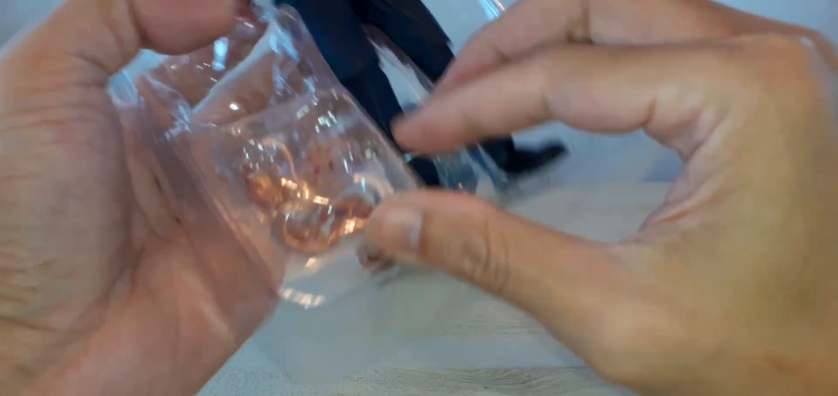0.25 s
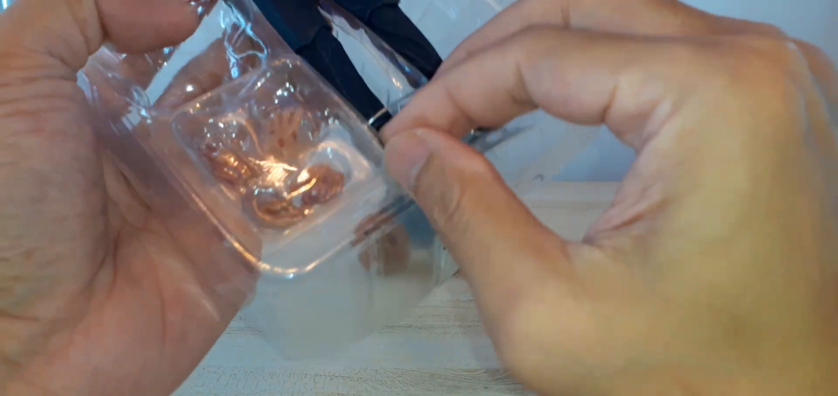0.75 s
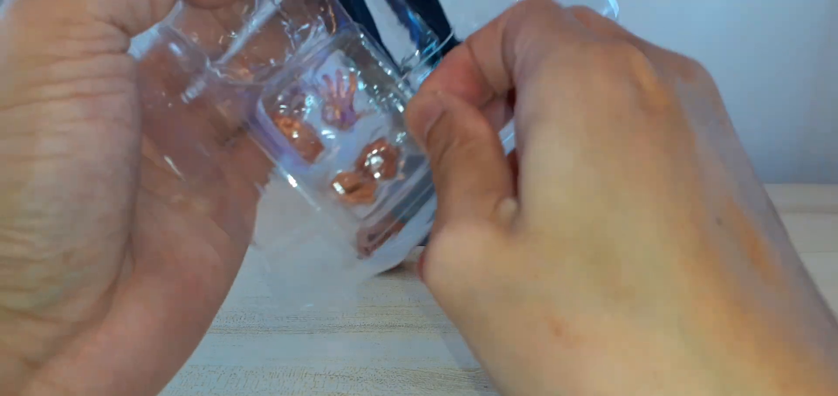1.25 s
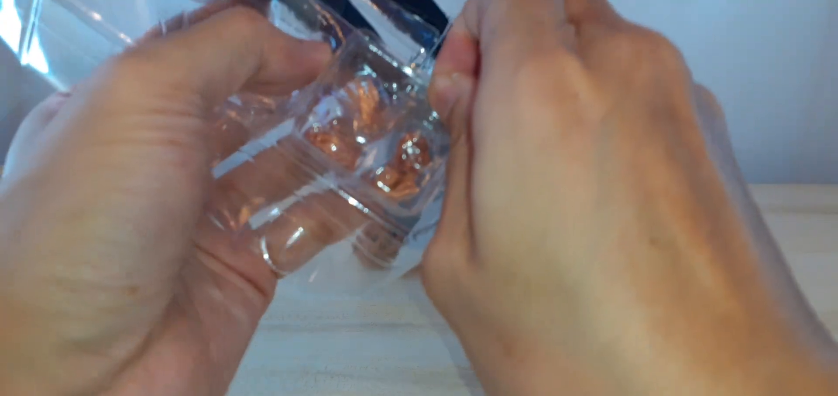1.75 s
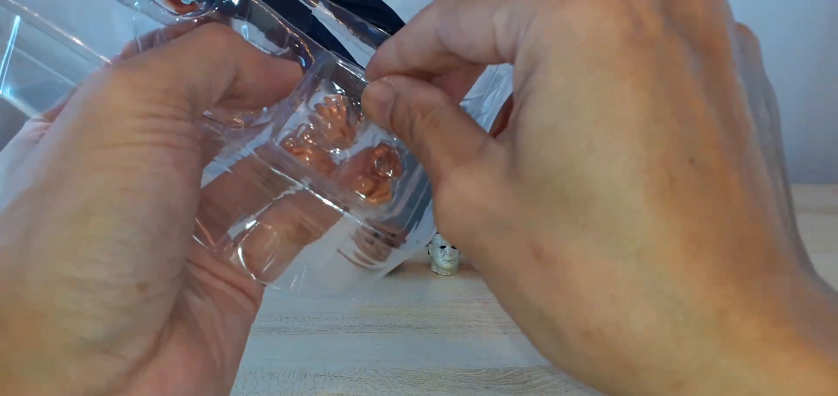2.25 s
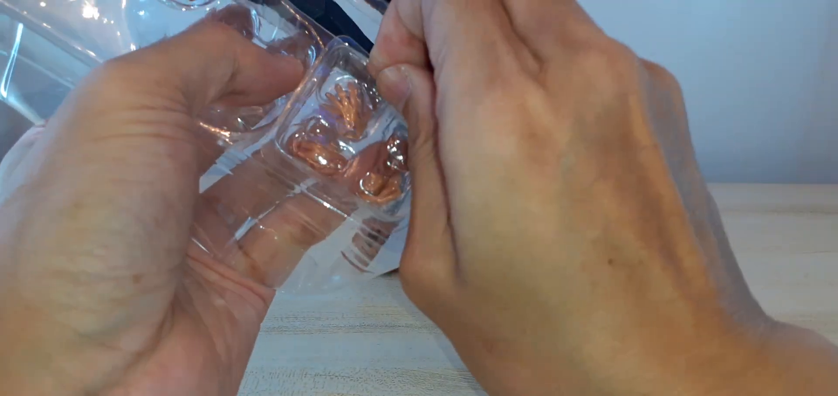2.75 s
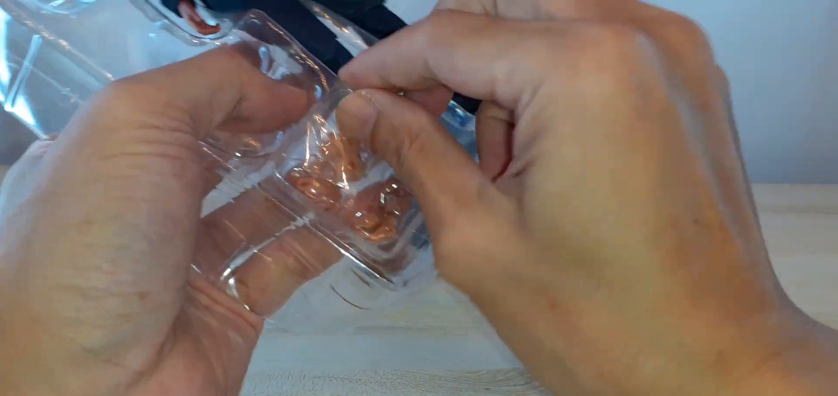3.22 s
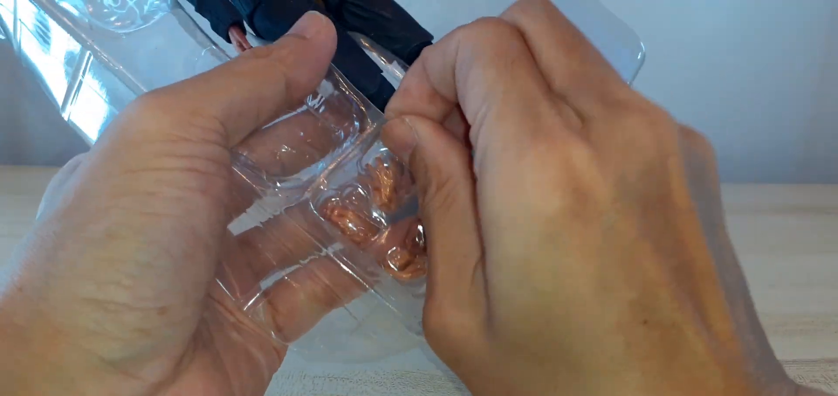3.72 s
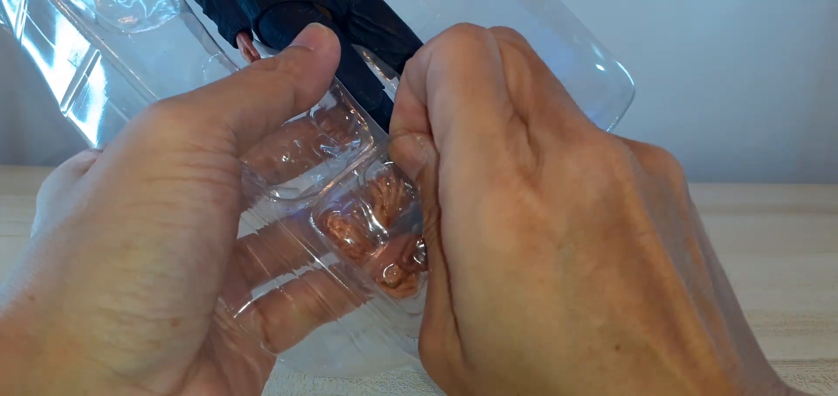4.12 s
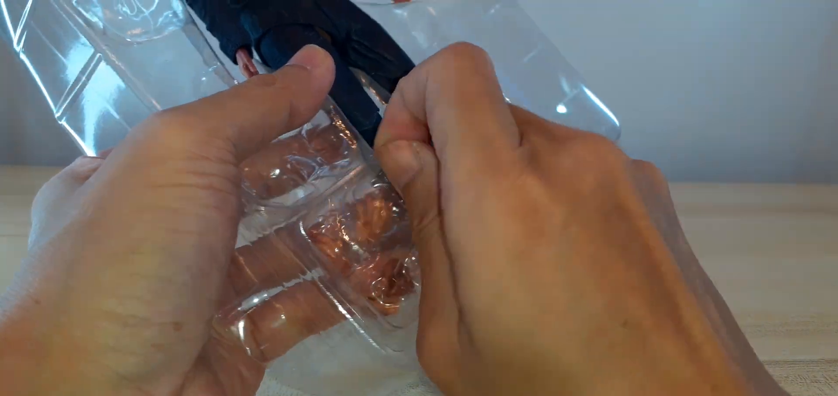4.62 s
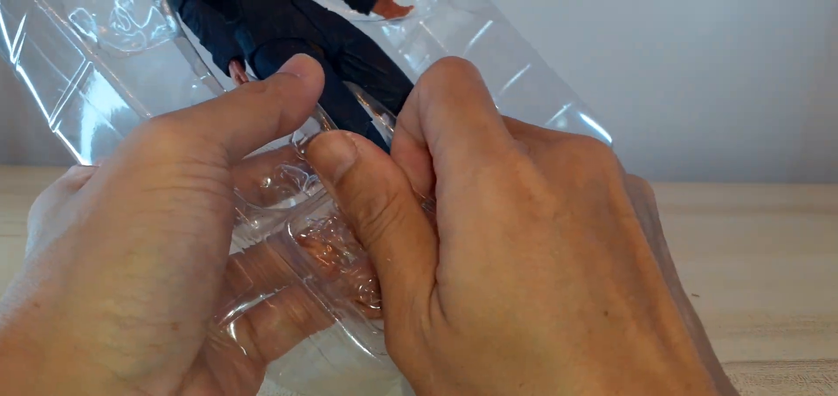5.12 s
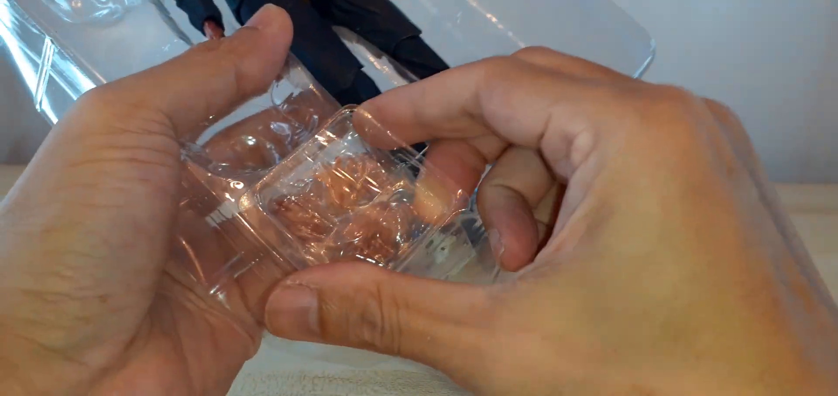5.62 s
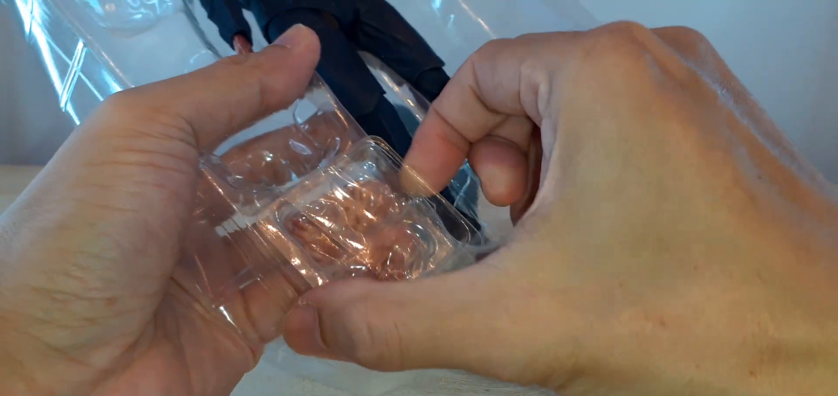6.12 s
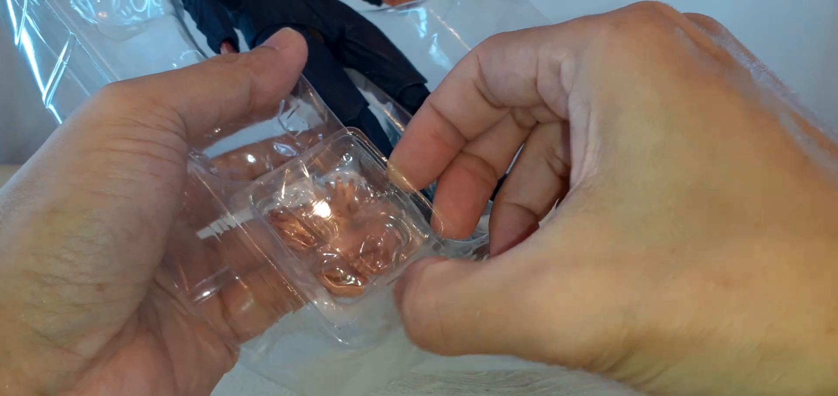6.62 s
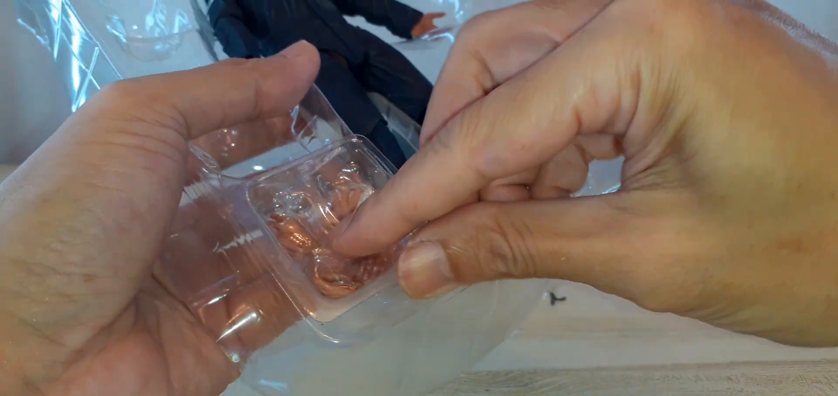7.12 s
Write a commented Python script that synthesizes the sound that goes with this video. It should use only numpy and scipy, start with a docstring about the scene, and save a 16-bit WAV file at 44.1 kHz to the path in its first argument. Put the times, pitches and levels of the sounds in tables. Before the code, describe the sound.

Close stereo pickup of fingers working a thin, hollow plastic blister tray in a small, lightly echoing room. Faint rubs and tiny ticks come first, then a burst of sharp snaps just after one second. A brief lull holds a barely audible squeak, then dense loud crackling with popping domes. It fades to scattered ticks, a dull knock with a pop near six seconds, quiet rubbing and a last hard crack.

```python
"""A light finger rub and a faint snap, then many sharp snaps: two hands pry at a thin plastic blister tray.
It holds small toy parts, close to a stereo microphone in a small room. Buckling facets are shaped noise bursts;
finger rubs are random stick-slip grains; dull knocks are decaying sines; one faint squeak is gliding tones.
The tray's body modes colour all but squeak and air; the room, decaying noise, rings for about half a second."""
import sys
import numpy as np
from scipy import signal
from scipy.fft import rfft, irfft
from scipy.io import wavfile
from scipy.ndimage import uniform_filter1d, map_coordinates

SR = 44100
rng = np.random.default_rng(int(sys.argv[2]) if len(sys.argv) > 2 else 0)


def bounce(signal):
    """Save signal as a 16-bit WAV file at the path given by the first command-line argument."""
    frames = np.transpose(np.atleast_2d(signal))
    limited = np.clip(frames, -1, 1)
    pcm = np.round(limited * 32767).astype(np.int16)
    wavfile.write(sys.argv[1], SR, pcm)


N = 324576

# buckling facets: start_s, crack_db, flex_db (re crack), treble_db (re crack), room_db (echo re direct)
FACET_SNAPS = [(0.0124, -46, -13, -4.5, -1.5), (0.244, -57, 0, -30, 5), (0.414, -47, -23, -15, -29),
               (0.8172, -40.5, -14.5, 7, -2.5), (1.0845, -35, -11.5, -4.5, -4), (1.142, -41, -12, -14, -8),
               (1.1773, -28, 0.5, -5, -13.5), (1.236, -32.5, 5, -0.5, -1.5), (1.276, -22, -5.5, -3.5, -8),
               (1.339, -48, -0.5, 16, -6), (1.3569, -15.5, -8, -5.5, -5.5),
               (1.3636, -21, -14.5, -2.5, -12.5), (1.4662, -33, -10, -2.5, -20),
               (1.4804, -32, -10, -20, -10.5), (1.5969, -25.5, -17.5, -6, -8.5),
               (1.6384, -34, -0.5, 1, -11), (1.7732, -47, -21, 1, -9.5), (2.0126, -36.5, -19.5, -22, -3),
               (2.0349, -39, -10, -6.5, -12), (2.0468, -45, -1, 12, -8), (2.1059, -28.5, -7.5, -7.5, -5),
               (2.204, -48.5, -7.5, 2.5, -2), (2.4983, -54.5, -8, .5, -2.5), (2.5807, -42, -4.5, -13, -5.5),
               (2.6942, -32.5, -6, -4.5, 2.5), (2.7859, -27, -3, 1, -7), (2.8352, -30.5, -5, -33.5, -3.5),
               (2.8844, -28.5, -6.5, -28.5, -28.5), (2.9611, -13, -19, -8, -10.5),
               (2.988, -24, -11, -13, 1), (3.061, -28.5, -9.5, -6, 0.5), (3.128, -25, -19.5, -5.5, -8),
               (3.1721, -28, -16, -13, -3), (3.2061, -19.5, -15.5, -4.5, -3.5),
               (3.2294, -26.5, -18, -4.5, -11), (3.567, -38.5, -6.5, -11, -0.5),
               (3.631, -14.5, -13, -5, -6.5), (3.6382, -23.5, -5.5, -21.5, -3),
               (3.7504, -17.5, -35, -12, -9.5), (3.773, -24, -21, -3, -5.5), (3.8915, -28, -14, 3.5, 0),
               (3.957, -31, -23, -4.5, 0), (4.0482, -29, -10.5, 6, -5.5), (4.0587, -22.5, -10.5, 0.5, 0.5),
               (4.392, -41, -21.5, -28, -2.5), (4.4269, -28.5, -14, -12, -4.5),
               (4.4701, -19, -14.5, -3.5, -5), (4.5022, -14.5, -14.5, -17, -5),
               (4.5765, -17.5, -11, -9, -5), (4.6625, -21, -9.5, -10, -4.5), (4.6817, -19, -27, -1.5, -6),
               (4.815, -39.5, -13, 3, -3), (4.864, -29, -2.5, -10, -2.5), (4.8885, -31.5, -6, -6.5, -16),
               (5.0208, -41, -28, -13, -17), (5.071, -48.5, -16, -28, -21), (5.113, -55, -16, -2, -22),
               (5.193, -37.5, -29, -14.5, -8.5), (5.2668, -44.5, -12.5, -7, -7),
               (5.3683, -50.5, -4.5, -20, 2.5), (5.4935, -39.5, -14.5, 2.5, -4),
               (5.6096, -49.5, -10, -1.5, -21), (5.9409, -33.5, -7, -6.5, 1.5), (5.981, -28, -19, 4.5, 1.5),
               (6.2123, -35, -14, -8.5, -1.5), (6.28, -40.5, -9, -17, -30), (6.3262, -36.5, -5, -6, -3.5),
               (6.3966, -43.5, -6, -37, -2), (6.5486, -44.5, 0, -1, -19), (6.7504, -42.5, -8.5, -5.5, -6.5),
               (6.84, -48.5, -7, -11, -21), (6.9562, -46.5, -14, -17, -9), (7.0846, -32, -22, -2, -1),
               (7.24, -38, -9, -13, 7), (7.2582, -16.5, -9.5, -4, -7.5)]
# blister domes popping through: start_s, room_level_db, pitch_hz, direct_extra_db
DOME_POPS = [(2.106, -30, 2660, 4.5), (3.131, -34, 2620, 9), (3.893, -19.5, 2610, -3.5),
             (4.060, -18.5, 1990, -10), (4.503, -22, 2020, -11), (5.982, -22.5, 2180, -7),
             (7.086, -27.5, 2120, -3)]
# finger strokes over the sheet: start_s, end_s, crackle_db (before the rub gains in tray)
FINGER_RUBS = [(0, .028, -45), (.245, .43, -54), (.658, .73, -51), (.913, 1.16, -57.5), (1.19, 1.338, -45),
               (1.451, 1.559, -46), (1.645, 1.845, -56.5), (2.02, 2.087, -43.5), (2.541, 2.682, -55),
               (2.718, 2.92, -43), (2.989, 3.318, -43.5), (3.657, 3.809, -39.5), (4.19, 4.30, -54),
               (4.505, 4.727, -44), (4.869, 4.943, -47), (4.984, 5.474, -57), (5.588, 5.657, -59),
               (5.834, 5.942, -74), (6.187, 6.425, -61.5), (6.491, 6.554, -41), (6.575, 7.03, -63.5),
               (7.19, 7.252, -48), (7.281, 7.351, -40)]
# soft knocks of hand and tray: start_s, level_db (before envelope and lean), pitch_hz, t60_s
SOFT_KNOCKS = [(.286, -27, 121, 0.058), (0.324, -38, 103, 0.14), (.335, -32.5, 264, 0.071),
               (0.371, -39, 115, .14), (1.233, -22, 164, 0.036), (1.357, -30.5, 129, 0.13),
               (1.64, -14, 270, 0.032), (2.708, -13.5, 251, 0.04), (3.194, -31, 170, .05),
               (4.059, -37, 98, 0.057), (4.861, -21.5, 227, 0.058), (5.093, -24.5, 245, 0.011),
               (5.611, -52, 107.7, 0.17), (5.982, -7, 310, 0.014), (5.979, -14.5, 105.6, 0.041),
               (5.982, -41, 56, 0.29), (6.495, -33, 194, 0.045), (7.258, -20, 204, 0.028)]
# taut edge dragged under a finger: time_s, lower_hz, upper_hz, level_db (before flutter and partial gains)
SQUEAK_GLIDE = [(1.829, 6050, 7200, -61), (1.888, 6440, 8100, -78), (1.93, 6800, 8550, -68),
                (1.965, 6870, 8700, -65), (2.005, 6550, 8300, -62)]
# colour of the flexing tray: freq_hz, gain_db
FLEX_COLOUR = [(40, -37.5), (80, -20), (140, -15.5), (200, -6.5), (280, -1), (355, 1), (430, -5.5),
               (600, -10), (1200, -39)]
# colour of the cracking sheet: freq_hz, gain_db
CRACK_COLOUR = [(250, -28.5), (480, -8), (640, -5), (800, -1.5), (1030, 5), (1280, 0.5), (1550, 2),
                (2300, -2.5), (3200, -6.5), (4200, -14), (6000, -37.5)]
# colour of the tiny folds: freq_hz, gain_db
TREBLE_COLOUR = [(2500, -19), (4000, 0), (6500, 1.5), (8500, 1), (9500, -12), (11000, -8.5), (12300, -4.5),
                 (15300, -10.5), (16500, -17)]
# modes of the whole tray: freq_hz, width_hz, gain_db (re plain sound)
BODY_MODES = [(362, 22, -8.5), (524.3, 14, -5), (643, 6.9, 2.5), (735, 7.2, -5), (840, 48, -9),
              (1018.5, 30, -4), (1190, 50, -10.5), (1419, 18, -8), (1653, 34, -5.5), (2080, 6.7, -7),
              (2410, 270, -10), (2680, 30, -9.5)]
# room decay: freq_hz, t60_s
ROOM_DECAY = [(100, 0.56), (300, 0.45), (800, 0.53), (2000, 0.54), (5000, 0.5), (13000, 0.42)]
# room colour: freq_hz, gain_db
ROOM_COLOUR = [(50, -7.5), (160, -2.5), (330, -0.5), (520, -0.5), (1000, -3), (2300, 0), (5000, -0.5),
               (8000, -1.5), (14000, -2.5)]
# colour of the still air: freq_hz, gain_db
AIR_COLOUR = [(25, -8), (100, 12.5), (350, -3.5), (1000, -4), (3000, -21), (8000, -14), (10000, -13),
              (16000, -29.5)]

# brighter facets are smaller: shorter crease (halved per HALVING_DB), higher ring (doubled per OCTAVE_DB)
CREASE_MS, HALVING_DB, LONGEST_MS = 2.38, 9.5, 3.6  # CREASE_MS and FACET_HZ hold at 0 dB of treble
FACET_HZ, OCTAVE_DB, LOWEST_FACET_HZ = 2330, 11, 1110
# rustle equals crackle at RUSTLE_EVEN_DB; RUSTLE_GROWTH is dB per dB of crackle
RUSTLE_EVEN_DB, RUSTLE_GROWTH = -66.5, 0.94
# fizz re crackle is FIZZ_DB at a crackle of FIRM_DB; FIZZ_GROWTH is dB per dB of crackle
FIZZ_DB, FIRM_DB, FIZZ_GROWTH = -5, -42, 0.11
HOLD_DB = -71  # holding hand's crackle throughout, before the rub gains in tray
BODY_DB = -0.5  # gain on plain sound and modes alike
PORT_LAG_S = 0.0002164  # the left port is nearer
TOP_HZ = 16250
HZ = np.maximum(np.fft.rfftfreq(1024, 1 / SR), 1)  # grid for colour filters


def undb(db):
    """Decibels to gain."""
    return 10 ** (np.asarray(db) / 20)


def along(points, hz):
    """Read (Hz, value) points on a log-frequency axis."""
    point_hz, value = np.transpose(points)
    return np.interp(np.log(np.maximum(hz, 1)), np.log(point_hz), value)


def colour(x, db):
    """Causal filter with the gain db on the grid HZ, built from its folded cepstrum."""
    cepstrum = irfft(np.log(undb(db)))
    half = len(cepstrum) // 2
    cepstrum[1:half] *= 2
    cepstrum[half + 1:] = 0
    impulse = irfft(np.exp(rfft(cepstrum)))
    return signal.fftconvolve(x, impulse[None], axes=1)[:, :x.shape[1]]


def resonance(hz, q):
    """Gain in dB of one damped mode on the grid HZ."""
    return -10 * np.log10(1 + (q * (HZ / hz - hz / HZ)) ** 2)


def level(x, db, seconds):
    """Scale a stereo sound to db, with its energy spread over the given time."""
    rms = np.sqrt(np.sum(x ** 2) / (2 * seconds * SR) + 1e-20)
    return x * undb(db) / rms


def ports(size, apart):
    """Noise at two ports: a common part and a share that each hears alone."""
    apart = np.clip(apart, 0, 1)
    common = np.sqrt(1 - apart) * rng.standard_normal(size)
    return common + np.sqrt(apart) * rng.standard_normal((2, size))


def burst(t, decay_ms, rise_ms):
    """Envelope that swells quickly and dies away."""
    ms = t * 1000
    return (1 - np.exp(-ms / rise_ms)) * np.exp(-ms / decay_ms)


def add(out, start_s, x):
    """Mix x into out at start_s."""
    i = int(np.clip(start_s * SR, 0, N - 1))
    out[:, i:i + x.shape[1]] += x[:, :N - i]


def facet_shape(treble_db):
    """Crease length (ms) and ring pitch (Hz) of a facet, both set by how bright it is."""
    length_ms = min(CREASE_MS * 2 ** (-treble_db / HALVING_DB), LONGEST_MS)
    ring_hz = max(FACET_HZ * 2 ** (treble_db / OCTAVE_DB), LOWEST_FACET_HZ)
    return length_ms, ring_hz


def snap(crack_db, flex_db, treble_db, length_ms, ring_hz, ring_db=-7, ring_q=6, ring_ms=4.1,
         flex_ms=5.6, tilt=0.67, lumpy_db=4):
    """A facet flips: a run of tiny folds spits treble, the sheet cracks and rings, the whole tray flexes."""
    size, span_s = 2048, .01
    t = np.arange(size) / SR
    # the crease runs in fits and starts, 16 samples each
    fits = np.clip(rng.standard_normal(size // 16), -2, 2)
    lumps = undb(lumpy_db * np.repeat(fits, 16))

    folds = ports(size, apart=.6) * lumps * burst(t, length_ms, rise_ms=.15)
    # sharper folds reach further into the top octave
    sharpness_db = np.clip(treble_db + 1.5, -10, 14)
    top_db = tilt * sharpness_db * np.log2(np.maximum(HZ, 4000) / 7000)
    treble = colour(folds, along(TREBLE_COLOUR, HZ) + top_db)

    sheet = ports(size, apart=0.53) * lumps * burst(t, ring_ms + 1.5 * length_ms, rise_ms=.25)
    crack = colour(sheet, along(CRACK_COLOUR, HZ))
    ring = ports(size, apart=0.64) * burst(t, ring_ms, rise_ms=0.26)
    facet = colour(ring, resonance(ring_hz, ring_q))
    bend = ports(size, apart=0.18) * burst(t, flex_ms, rise_ms=1.0)
    flex = colour(bend, along(FLEX_COLOUR, HZ))

    mix = level(crack, -1.44, span_s) + level(facet, ring_db, span_s)
    mix = mix + level(treble, treble_db, span_s) + level(flex, flex_db + .5, span_s)
    return undb(crack_db) * mix


def pop(level_db, hz, q=2.3, decay_ms=2.1):
    """A dome turns inside out: a noise burst rings around one pitch."""
    t = np.arange(1024) / SR
    flip = ports(len(t), apart=1.0) * burst(t, decay_ms, rise_ms=.3)
    return level(colour(flip, 2 * resonance(hz, q)), level_db, .01)


def rub(seconds, crackle_db, rustle_db, fizz_db, rate_hz=160, spread_db=5.0, grain_ms=2.2):
    """Skin sticks and slips on the sheet: many little jerks of very uneven size over a faint steady drag."""
    size = int(max(seconds, .02) * SR)
    span_s = size / SR
    t = np.arange(size + 1024) / SR
    hits = rng.random(size) < rate_hz / SR
    jerks = hits * undb(spread_db * np.minimum(rng.exponential(size=size), 2.8))
    grip = signal.fftconvolve(jerks, burst(t, grain_ms, rise_ms=0.11))[:len(t)]
    grip[:size] += .18 * signal.windows.tukey(size, .5)  # steady drag

    crackle = colour(ports(len(t), apart=0.078) * grip, along(CRACK_COLOUR, HZ))
    fizz = colour(ports(len(t), apart=1.0) * grip, along(TREBLE_COLOUR, HZ))
    rustle = colour(ports(len(t), apart=0.3) * grip, along(FLEX_COLOUR, HZ))
    mix = level(crackle, crackle_db, span_s) + level(fizz, crackle_db + fizz_db, span_s)
    return mix + level(rustle, rustle_db, span_s)


def stroke(seconds, crackle_db):
    """One slide of a finger: pressing harder adds more fizz than crackle, and more crackle than rustle."""
    rustle_db = RUSTLE_EVEN_DB + RUSTLE_GROWTH * (crackle_db - RUSTLE_EVEN_DB)
    fizz_db = FIZZ_DB + FIZZ_GROWTH * (crackle_db - FIRM_DB)
    return rub(seconds, crackle_db, rustle_db, fizz_db)


def knock(level_db, hz, t60_s, contact_ms=2.1):
    """A padded blow swings the tray as a decaying sine; the deepest ones reach the left port more."""
    t = np.arange(SR // 5) / SR
    decay_ms = t60_s * 1000 / np.log(1000)
    swing = np.sin(2 * np.pi * hz * t) * burst(t, decay_ms, contact_ms)
    lean_db = 11 * np.clip(np.log2(170 / hz), 0, 2)
    return undb(level_db + np.array([[lean_db], [-lean_db]]) / 2) * swing


def tray(outward, rub_db=-3.0, rub_room_db=-5, knock_room_db=-9):
    """All that the tray sends one way: to the ports (outward 0) or into the room (outward 1)."""
    out = np.zeros((2, N))
    for start_s, crack_db, flex_db, treble_db, room_db in FACET_SNAPS:
        facet = snap(crack_db, flex_db, treble_db, *facet_shape(treble_db))
        add(out, start_s, facet * undb(outward * room_db))
    for start_s, level_db, hz, direct_extra_db in DOME_POPS:
        add(out, start_s, pop(level_db + (1 - outward) * direct_extra_db, hz))
    for start_s, level_db, hz, t60_s in SOFT_KNOCKS:
        add(out, start_s, knock(level_db + outward * knock_room_db, hz, t60_s))
    for start_s, end_s, crackle_db in [*FINGER_RUBS, (0, N / SR, HOLD_DB)]:
        add(out, start_s, stroke(end_s - start_s, crackle_db) * undb(rub_db + outward * rub_room_db))
    return out


def body(x):
    """The hollow tray rings along in its own modes, each a narrow resonator."""
    rings = 0
    for hz, width_hz, gain_db in BODY_MODES:
        b, a = signal.iirpeak(hz, hz / width_hz, fs=SR)
        rings = rings + undb(gain_db) * signal.lfilter(b, a, x)
    return undb(BODY_DB) * (x + rings)


def squeak(waver=.06, flutter_db=3):
    """Thin tones rise with the pull and sag again; the grip flutters in pitch and strength."""
    t = np.arange(N) / SR
    time_s, *columns = np.transpose(SQUEAK_GLIDE)
    lower_hz, upper_hz, level_db = (np.interp(t, time_s, column) for column in columns)
    slip = 1 + waver * uniform_filter1d(rng.standard_normal(N), size=100)
    # strength flutter, a new value every 10 ms
    grip = np.interp(t, np.arange(800) / 100, np.clip(rng.standard_normal(800), -2, 1))
    tones = 0
    for hz, gain in ((lower_hz, .35), (upper_hz, .55), (2 * lower_hz, .08)):
        tones = tones + gain * np.sin(2 * np.pi * np.cumsum(hz * slip) / SR)
    sounding = (t > time_s[0]) * (t < time_s[-1])
    return tones * undb(level_db + flutter_db * grip) * sounding


def room(x, first_ms=3.3, alike_hz=750):
    """Diffuse tail of one outgoing beam, in half-octave bands; long waves reach both ports alike."""
    t = np.arange(32768) / SR
    hz = np.fft.rfftfreq(len(t), 1 / SR)
    alike = 1 / (1 + (hz / alike_hz) ** 4)
    mid, side = rfft(rng.standard_normal((2, len(t))))
    field = mid * np.sqrt(1 + alike) + np.array([[1], [-1]]) * side * np.sqrt(1 - alike)
    field = field * undb(along(ROOM_COLOUR, hz))
    edges_hz = 30 * 2 ** np.arange(0, 10, .5)
    tail = 0
    for low_hz, high_hz in zip(edges_hz, edges_hz[1:]):
        fade = np.log(1000) / along(ROOM_DECAY, np.sqrt(low_hz * high_hz))
        band = irfft(field * (hz >= low_hz) * (hz < high_hz))
        tail = tail + band * np.exp(-fade * t) * np.sqrt(fade / SR)
    onset = 1 - np.exp(-(t * 1000 / first_ms) ** 2)
    mono = x.mean(axis=0)[None]
    return signal.oaconvolve(mono, tail * onset, axes=1)[:, :N]


def still_air(air_db):
    """Steady coloured noise, partly shared by the ports."""
    return level(colour(ports(N, apart=0.78), along(AIR_COLOUR, HZ)), air_db, N / SR)


def scene(room_db=0.5, air_db=-77, beams=4):
    """The tray close to the ports, its echo in the room, the squeak and the still air."""
    left, right = tray(outward=0)
    right = map_coordinates(right, [np.arange(N) - PORT_LAG_S * SR], order=5)
    # the crumpled sheet sends a different wave each way, so the echo is smoother in colour than the snap
    echo = sum(room(tray(outward=1)) for _ in range(beams)) / np.sqrt(beams)
    rung = body(np.array([left, right]) + undb(room_db) * echo)
    return rung + squeak() + still_air(air_db)


def record(dry, low_hz=44):
    """The recorder thins the deep bass, rounds the highest peaks and cuts the top."""
    thin = signal.sosfilt(signal.butter(3, low_hz, "high", fs=SR, output="sos"), dry)
    rounded = np.tanh(thin)
    return signal.sosfilt(signal.ellip(8, .2, 70, TOP_HZ, fs=SR, output="sos"), rounded)


dry = scene()
out = record(dry)
bounce(out)
```